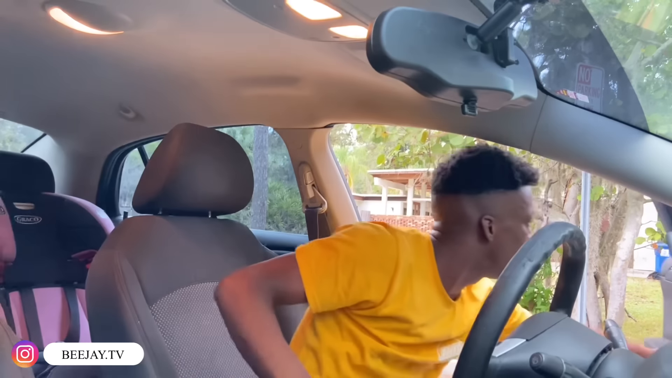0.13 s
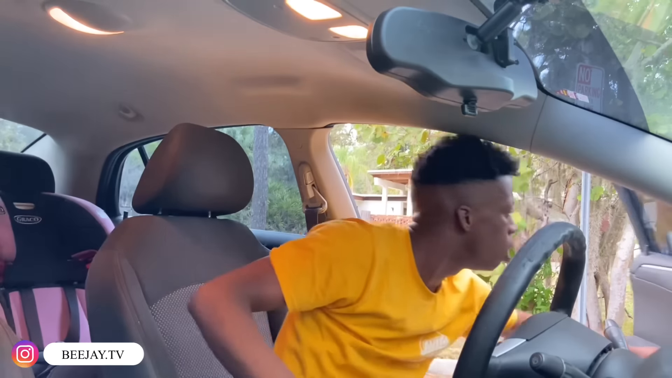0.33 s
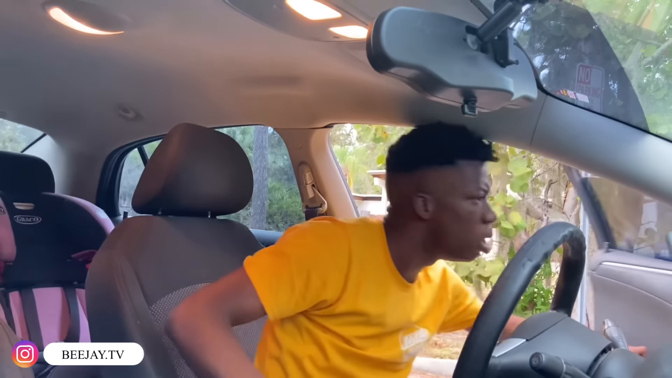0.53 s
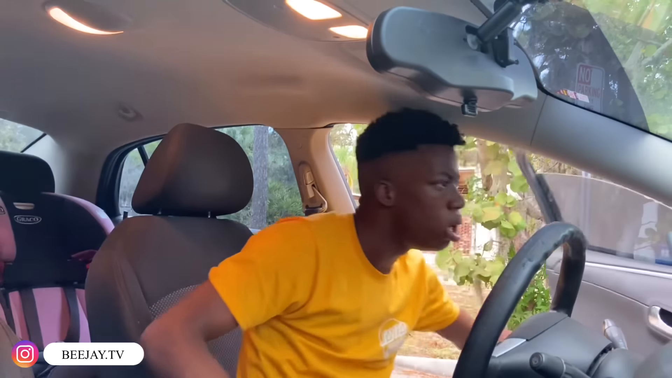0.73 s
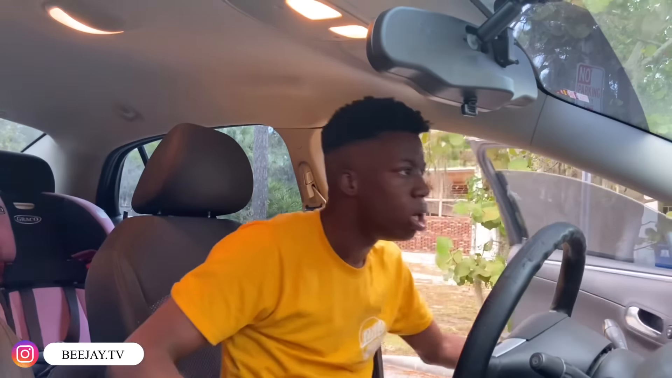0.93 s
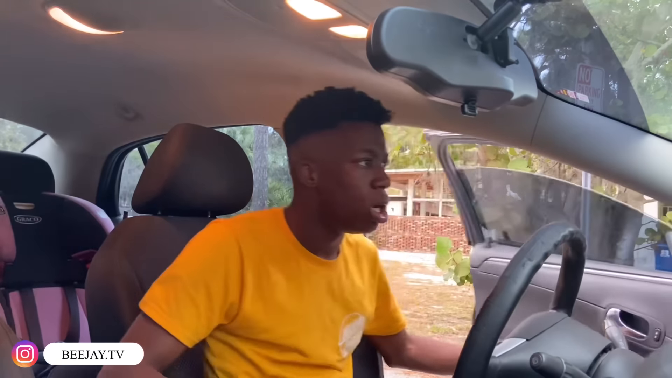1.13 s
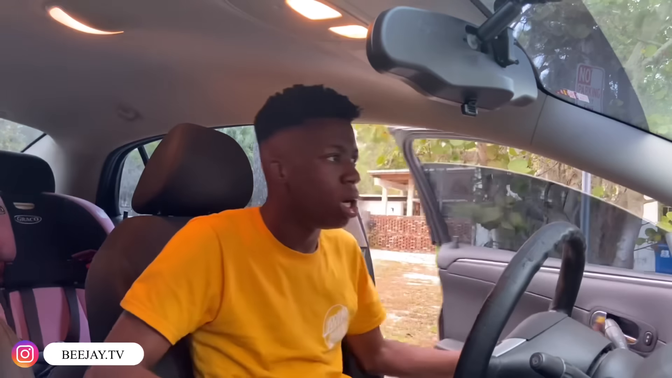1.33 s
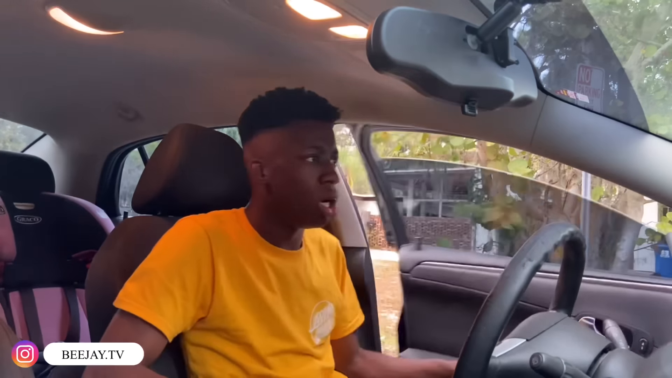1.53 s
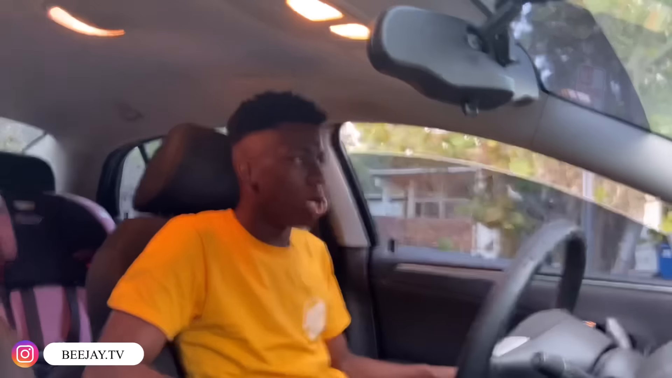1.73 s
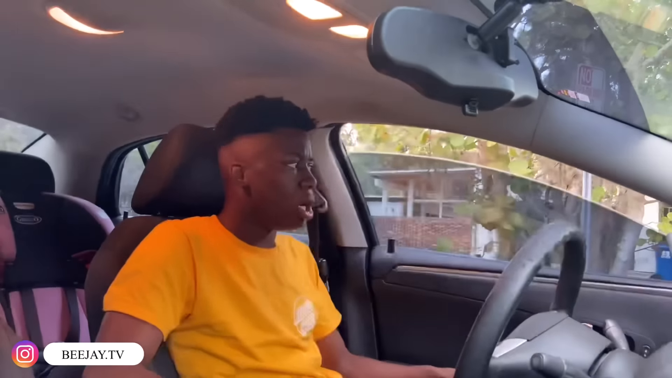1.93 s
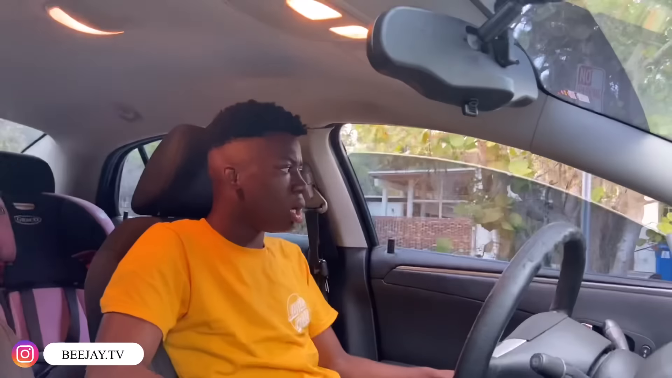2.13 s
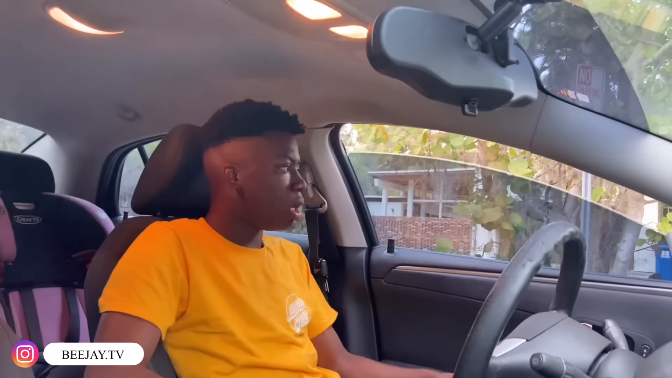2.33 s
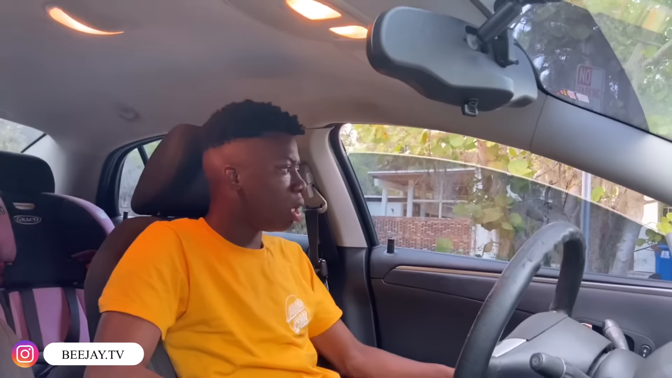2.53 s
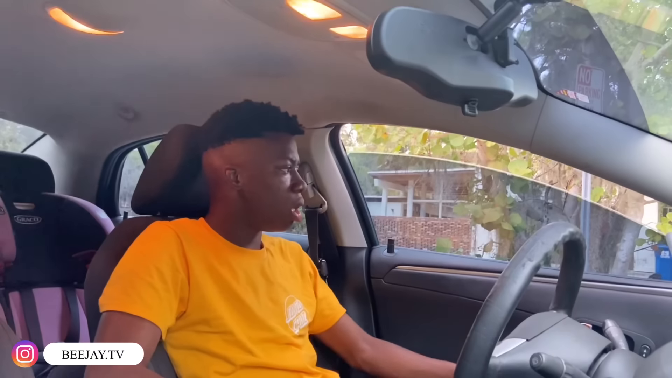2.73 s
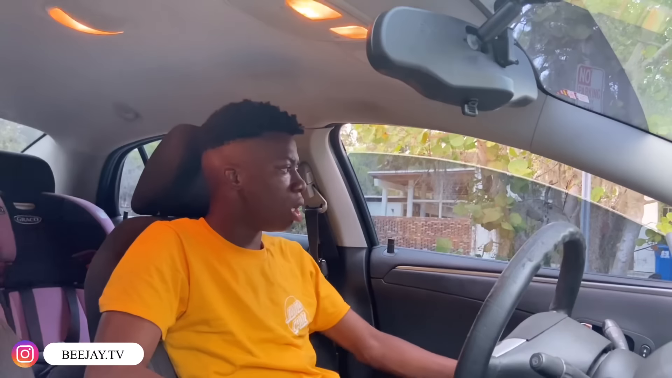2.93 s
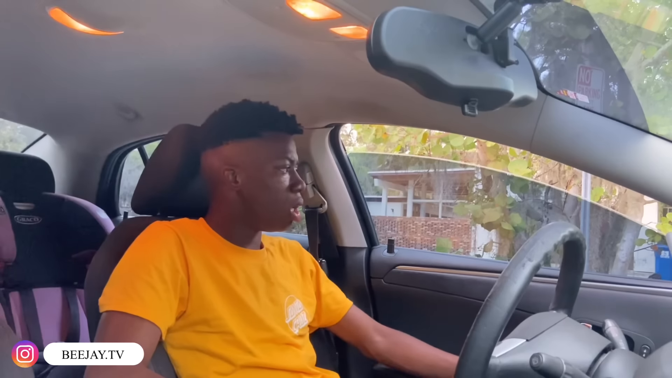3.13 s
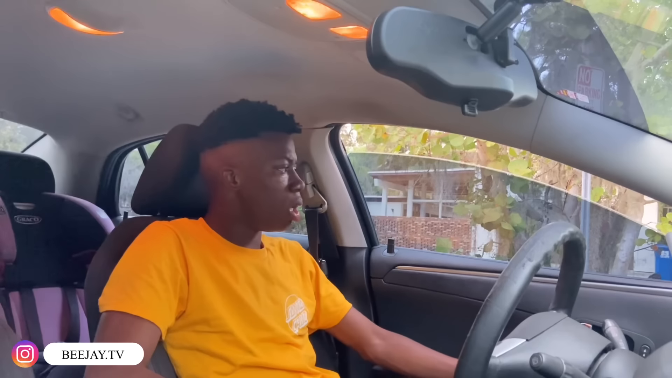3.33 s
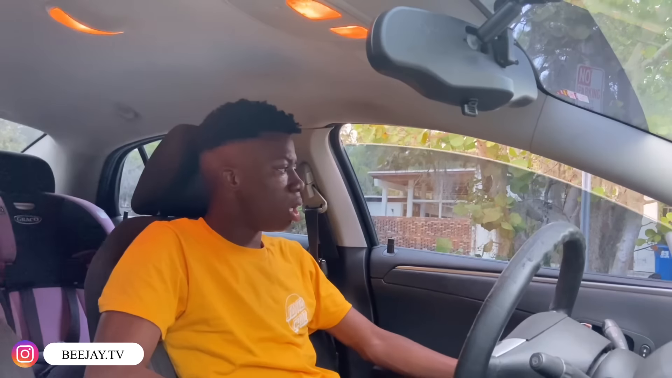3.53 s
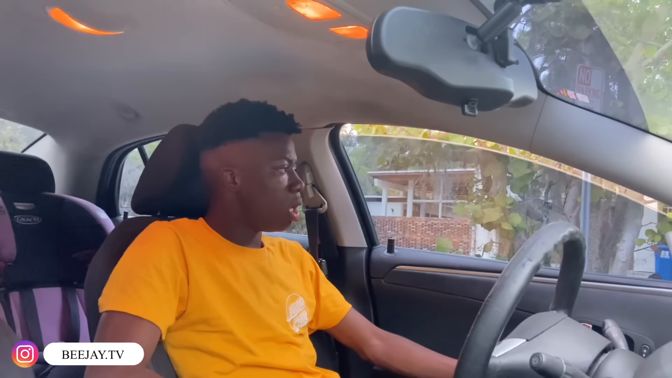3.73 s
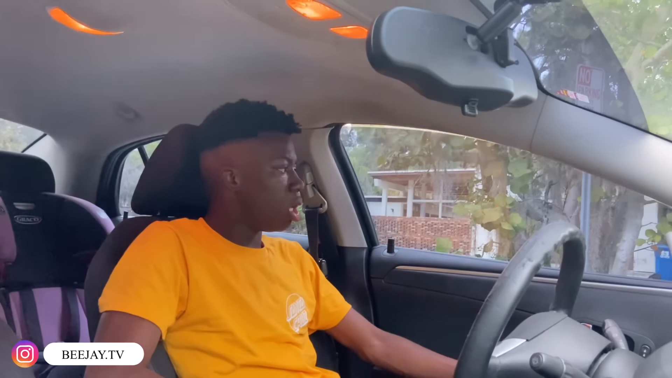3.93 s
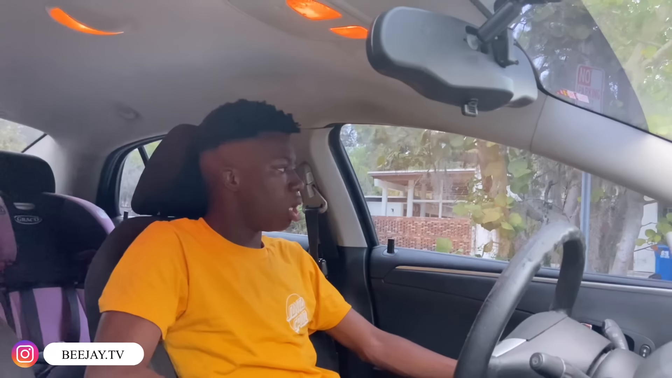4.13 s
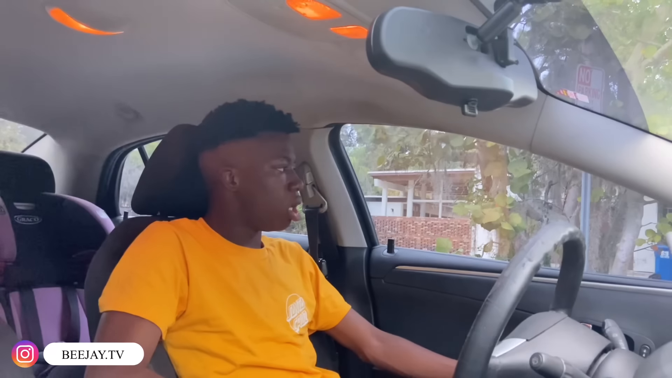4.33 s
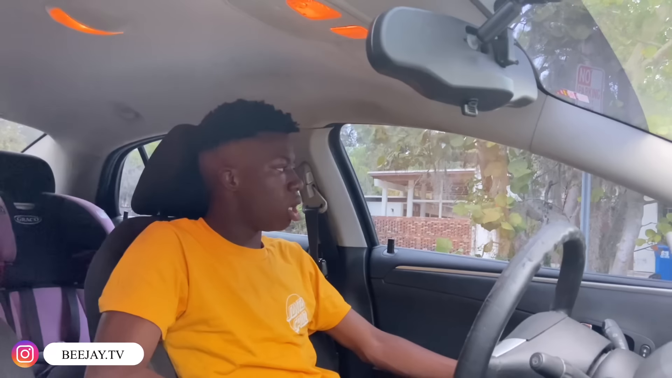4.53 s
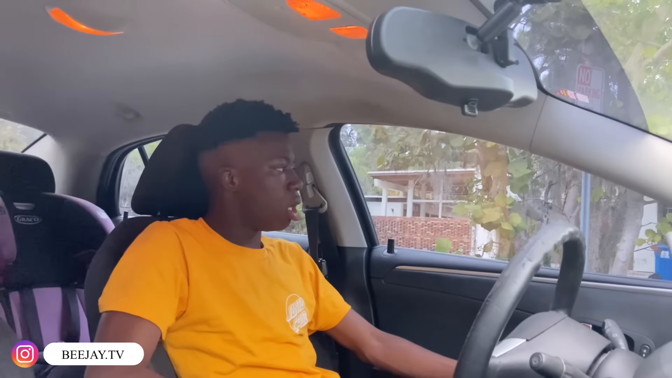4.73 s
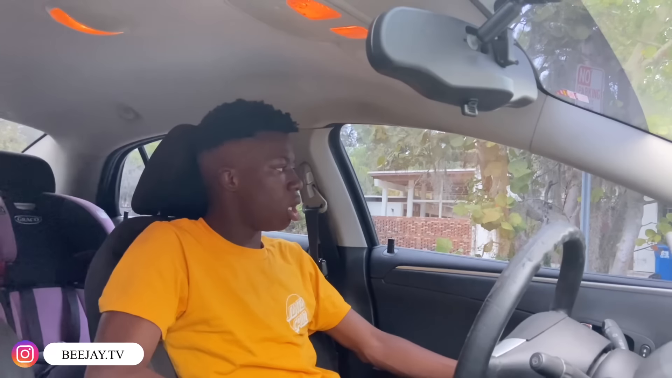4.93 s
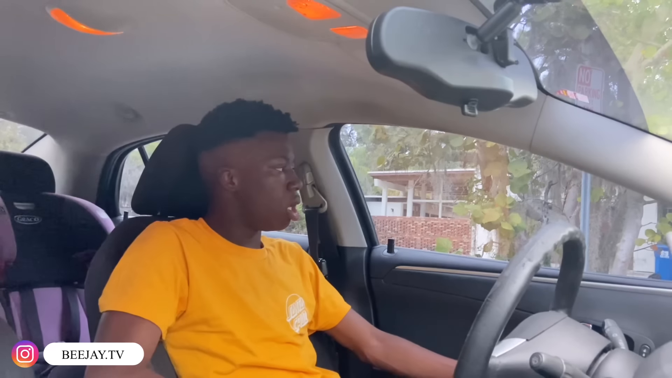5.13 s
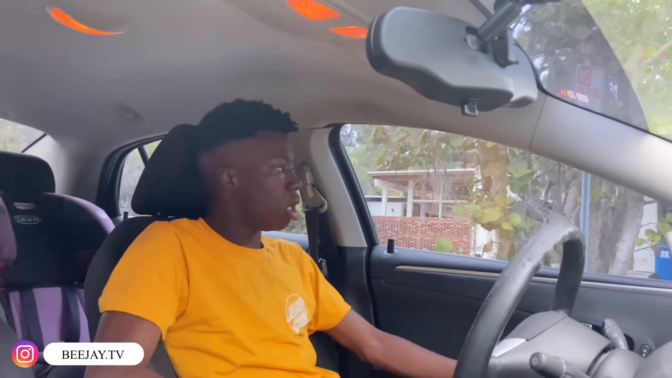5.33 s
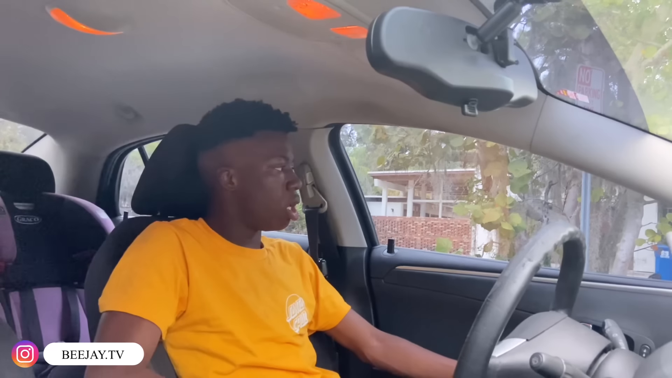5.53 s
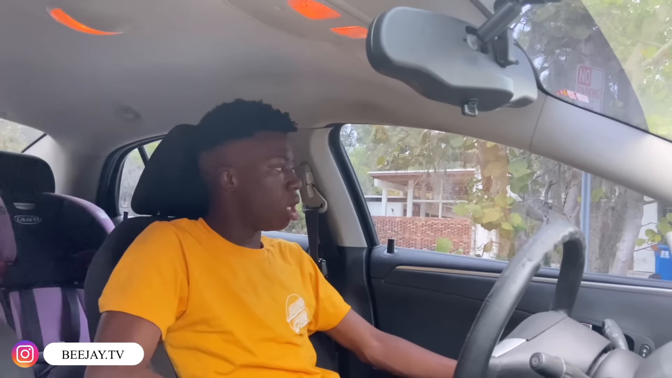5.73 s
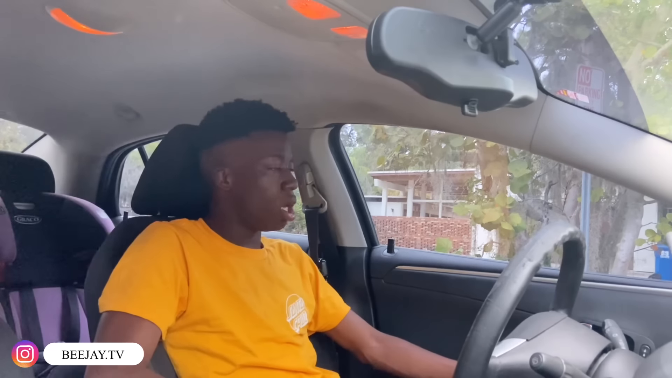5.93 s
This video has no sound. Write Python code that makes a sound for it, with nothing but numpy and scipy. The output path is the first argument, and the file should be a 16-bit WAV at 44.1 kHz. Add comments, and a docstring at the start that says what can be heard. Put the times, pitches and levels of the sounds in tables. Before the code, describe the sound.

Inside a small car with the engine idling low, air and clothing rustle through the open door. The door bumps dully as it is pulled, clicks, then slams with a loud latch crack, bassy body boom and short trim rattle. Quiet scuffs and taps follow. A power window then clunks, drones and whines upward, glass rubbing rubber, and thuds into its seal. Heard from the dashboard on a phone.

```python
"""A car door slams at close range: latch, body and trim ring as damped modes under a burst of rattle noise.
The open door bumps dully before it; clicks and scuffs come before and after it, taps and ticks after it.
Later the power window drones and whines upward, its glass rubbing the rubber, until it thuds into its seal.
Behind all this a four-cylinder engine idles as hum, rumble and knocks, with a patchy rustle of air and clothes.
The place is the cabin, heard from the dashboard through the two microphone ports of a phone."""
import sys
import numpy as np
from scipy import signal
from scipy.fft import rfft, irfft, next_fast_len
from scipy.io import wavfile
from scipy.ndimage import uniform_filter1d

SR = 44100
rng = np.random.default_rng(int(sys.argv[2]) if len(sys.argv) > 2 else 0)


def store_wav(level_fs):
    """Save 16-bit WAV to argv[1]."""
    pcm = np.round(np.clip(np.atleast_2d(level_fs), -1, 1) * 32767)
    wavfile.write(sys.argv[1], SR, pcm.T.astype(np.int16))


N = 267554
T = np.arange(N) / SR  # s

# All levels in the tables are relative: the port balance and the phone come after them.
# Likeness of the two microphone ports. Each row: frequency in Hz, likeness of left and right from 0 to 1.
PORT_LIKENESS = [(60, .95), (130, 0.97), (270, 0.9), (580, 1), (1200, 0), (12000, 0)]
LEFT_DB, LEFT_LAG_S = -2.1, .00046  # left against right
CEILING, TOP_HZ = 0.82, 12350  # the phone's limit on a full scale of 1, and its upper cutoff

# Outside air and clothes, loud with the door open and faint after the slam. Each row: time in seconds, level in dB.
AIR = [(0, -68.5), (1.1, -65.5), (1.88, -69), (2.03, -80), (3.05, -76), (3.33, -72)]
# Colour of that rustle. Each row: frequency in Hz, density in dB per Hz.
AIR_COLOUR = [(410, -31.5), (700, -23), (734, -3), (788, -2.5), (1750, -14.5), (3970, -19.5), (6540, -28),
              (9350, -48.5), (12000, -59), (15600, -81), (22000, -120)]

# Idle speed. Each row: time in seconds, firings per second.
FIRING_RATE = [(0, 24.42), (.45, 24.9), (1.1, 24.135), (1.8, 23.836), (3.1, 23.85), (3.8, 23.984),
               (4.4, 23.595), (6.07, 24.415)]
FIRST_FIRING = .105  # part of a firing already gone at the start
# Engine hum. Each row: multiple of the firing rate, level in dB.
HUM_ORDERS = [(1, -49.5), (2, -40.5), (3, -45), (4, -50.5), (5, -49), (6, -59.5), (8, -50.5)]
# Engine in the cabin, muffled once the door is shut, boomier as the window closes.
# Each row: time in seconds, hum and rumble in dB, knocks in dB, sharpness of their strike in dB.
IDLE = [(0, 0.5, -3.5, -6), (1.1, 2, -0.5, -6), (1.7, 1, -2, -5.5), (2.1, -1, -7.5, -6),
        (2.6, -3, -5, -5.5), (3.2, -2, -3, -5), (3.45, -1.5, -1.5, -6.5), (4.25, 0, 0.5, -6.5),
        (4.4, 1, -1, -1), (6.07, 1.5, -1.5, 0)]
# Colour of the engine rumble. Each row: frequency in Hz, density in dB per Hz.
RUMBLE_COLOUR = [(18, -21.5), (31, -27), (48, -6.5), (85, -1.5), (130, -8), (200, -14), (300, -18),
                 (430, -28.5), (780, -44), (1000, -46), (1800, -59), (3500, -71.5), (7000, -74.5),
                 (12300, -84.5)]
RUMBLE_DB = -37.5
# Knocks in each firing. Each row: place in the firing from 0 to 1, centre in Hz, width in Hz of each filter pass,
# t60 in seconds, level in dB, clean strike against its noise in dB.
FIRING_KNOCKS = [(.23, 285, 310, .09, -54, -4), (.285, 535, 210, .032, -58.5, 2),
                 (.775, 535, 210, .035, -61.5, -2), (.245, 745, 195, .032, -60.5, 1),
                 (.55, 745, 195, .15, -70, -8), (.19, 1795, 270, .07, -81.5, 1.5),
                 (.21, 2950, 800, .02, -89, 2), (.225, 3800, 3000, .013, -92.5, 0)]

# Window going up; the drone sags as the seal grips the glass.
# Each row: time in seconds, door panel drone in Hz, drone level in dB, motor shaft hum in dB.
WINDOW = [(3.35, 73.6, -42, -50), (3.375, 75.5, -38, -48), (3.41, 78, -30, -46), (3.45, 80.3, -28.5, -45),
          (3.5, 81, -26, -44), (3.63, 82.6, -27.5, -44), (3.8, 81.6, -26, -42), (4, 80.5, -25.5, -35),
          (4.315, 78, -28.5, -35)]
SHAFT_HZ, SHAFT_START = 72.6, .07  # motor shaft, which beats against the drone; start in turns
# Motor whine. Each row: multiple of the shaft rate, level in dB.
WHINE = [(5, -60), (6, -68.5), (7, -60), (8, -70), (10, -61.5), (12, -88), (13, -75.5), (14, -85.5),
         (15, -85.5), (17, -80), (18, -87.5), (28, -98), (30, -89.5)]
# Colour of the glass dragging in the seal. Each row: frequency in Hz, density in dB per Hz.
RUB_COLOUR = [(700, -13.5), (1200, -10.5), (1800, -21), (2150, -19), (2500, -25), (2950, -17), (3400, -23),
              (4800, -25), (5600, -30), (6600, -28), (9900, -56), (12300, -51.5)]
RUB_DB, RUB_RISE_DB_S = -70, 6.5  # start, and rise in dB per s as more of the glass is gripped
# Singing rubber: start in Hz, sag in Hz per s, rate in Hz of its random levels, level in dB.
SEAL_HZ, SEAL_SAG_HZ_S, SEAL_WIDTH_HZ, SEAL_DB = 3100, 227, 130, -82
# Lift gear. Each row: mode in Hz, level in dB, t60 in seconds.
GEAR = [(177.5, -1, .1), (317, 4, 0.12), (450, -7, 0.083), (540, -6, 0.052), (626, -13, 0.06)]
# Gear taking up its slack. Each row: time in seconds, push in dB, contact in seconds.
CLUNKS = [(3.341, -36, 0.00096), (3.352, -34, .0015), (3.364, -42.5, 0.00077), (3.380, -35.5, 0.00071),
          (3.389, -40, 0.00092), (3.41, -38, 0.00096), (3.421, -38.5, 0.00095), (3.463, -41.5, .0013)]
# Window frame struck by the glass. Each row: mode in Hz, level in dB, t60 in seconds.
FRAME = [(51.3, -2.5, 0.65), (89, -8.5, 0.65), (129, 11, 0.047), (240.3, -2, 0.073), (316, -5, 0.081),
         (430, -8, 0.18), (540, -23, 0.038)]
# Glass meeting its stop and rebounding. Each row: time in seconds, push in dB, contact in seconds.
STOPS = [(4.325, -27, 0.00064), (4.329, -15, 0.0022), (4.350, -15, 0.0043), (4.396, -22.5, 0.0043)]

# Sharp clicks and ticks, the latch crack, and strong engine knocks through the open door.
# Each row: time in seconds, peak in dB ahead of the tilt between ports, centre in Hz,
# width in Hz of each filter pass, t60 in seconds.
CLICKS = [(.809, -55.5, 3440, 2500, 0.042), (.809, -46, 550, 200, 0.095), (.902, -39, 540, 197, 0.11),
          (.899, -56.5, 2470, 2500, .06), (.948, -46, 2260, 3270, 0.12), (.992, -52, 1780, 2480, 0.072),
          (1.145, -54.5, 2980, 3500, .032), (1.191, -56, 3450, 3000, 0.059),
          (1.227, -55.5, 2990, 2970, 0.074), (1.6795, -11.5, 2975, 2000, 0.024),
          (1.68, -18, 5190, 4500, .025), (2.382, -57.5, 3000, 3500, 0.084), (2.571, -66.5, 1850, 500, .06),
          (2.613, -64, 3650, 600, 0.048), (2.625, -54, 4600, 4570, 0.093), (3.075, -60, 2395, 2000, 0.064),
          (3.195, -60, 3030, 2000, 0.084), (3.264, -64, 4500, 2990, .06), (3.294, -56.5, 3300, 3450, 0.13),
          (3.330, -43, 2900, 2010, 0.068), (3.336, -40, 1790, 3440, 0.076), (3.488, -60, 1850, 357, .06),
          (5.826, -64.5, 2960, 3000, 0.027), (5.844, -51, 4530, 3230, 0.077),
          (5.853, -53, 3620, 150.5, 0.066)]
# Scuffs, and growl of the window motor, that swell before they fade.
# Each row: the same columns in the same units as the clicks.
SCUFFS = [(.125, -66.5, 4050, 2000, .2), (.25, -60.5, 4050, 2500, .15), (.305, -51.5, 2570, 2510, 0.34),
          (.447, -56, 2750, 3000, 0.35), (.45, -69, 8200, 2000, .1), (.63, -57, 1690, 1810, .12),
          (1.3, -62.5, 4160, 2080, 0.2), (2.0, -56, 1490, 1780, 0.27), (2.245, -64.5, 2000, 2480, 0.38),
          (2.52, -63.5, 1280, 1503, 0.28), (2.98, -69.5, 2490, 3500, 0.39), (2.64, -54, 1250, 490, 0.23),
          (2.645, -56.5, 2460, 3010, 0.16), (3.335, -50, 500, 500, 0.52), (3.39, -43.5, 450, 450, 0.44),
          (4.165, -50.5, 3130, 2500, 0.12), (4.18, -45, 2360, 2940, 0.1), (4.25, -55.5, 1387, 395, 0.13),
          (4.305, -46.5, 1730, 2650, 0.25), (5.832, -65, 4000, 2500, .15)]
CLICK_RISE_S, SCUFF_RISE_S = 0.00068, 0.009
CLICK_LEFT_DB = 3  # left minus right, clicks and scuffs alike
CLICK_STRIKE_DB, CLICK_APART = 15, 1  # clean impulse in a click; weight of noise that differs between the ports
# Hard trim. Each row: mode in Hz, level in dB, t60 in seconds.
TRIM = [(653, -6.5, 0.052), (895, -0.5, 0.052), (1110, -9.5, 0.041), (1258, -6.5, 0.078),
        (1320, -10.5, .05), (1730, -11, 0.045)]
# Taps of a hand on the trim. Each row: time in seconds, push in dB, contact in seconds.
TAPS = [(2.248, -57, 0.00039), (2.624, -42.5, 0.00051), (2.629, -41.5, 0.00056), (3.075, -44, .0008),
        (3.189, -55, 0.00064), (3.198, -54, 0.00045), (3.336, -49, .0004), (3.343, -46, 0.00069),
        (3.38, -39.5, 0.0012)]
# Small hard plastic part. Each row: mode in Hz, level in dB, t60 in seconds.
PLASTIC = [(1920, -2, .03), (3020, 6.5, .05), (3620, 0, .05), (4320, -19.5, .03), (4840, -11.5, 0.04),
           (6200, -12, 0.04)]
# Ticks of the plastic part. Each row: time in seconds, push in dB, contact in seconds.
TICKS = [(2.383, -63, .0001), (2.626, -55, .00008), (5.845, -58.5, .0001)]

# Damped modes of the open door. Each row: mode in Hz, level in dB, t60 in seconds.
OPEN_DOOR = [(69, -4, 0.19), (105, -2, 0.063), (175, 3, 0.049), (337, -6.5, 0.065), (494, 0, 0.049)]
# Bumps as the door is pulled. Each row: time in seconds, push in dB, contact in seconds.
BUMPS = [(.628, -31, 0.00093), (.638, -23, 0.0016), (.643, -19, 0.0041), (.661, -22.5, 0.0025),
         (.6765, -18, 0.0067), (1.026, -21, 0.0047), (1.053, -20.5, 0.0045)]
# Door, body and cabin air. Each row: mode in Hz, level in dB.
BODY = [(48, -10), (64, -10), (78, -8), (85, -3), (92, 2), (110, -2), (133, -6), (152, -8.5), (184, -3.5),
        (212, -11), (232, -4.5), (248, -7), (272, -4), (296, -5), (324, -4), (345, -6.5), (393, -14),
        (420, -11), (466, -10.5), (490, -11), (560, -35.5), (650, -33), (738, -18), (861, -24),
        (980, -24.5), (1185, -18.5), (1272, -21), (1432, -43), (1780, -19), (2012, -24), (2270, -27.5),
        (2610, -21.5), (2770, -19.5), (3040, -8.5), (3640, -26.5), (3940, -22.5)]
BODY_T60, BODY_DAMPING = 0.35, 0.75  # ring in s of the main boom at 92 Hz; higher modes die faster by this power
# Blows on the body. Each row: time in seconds, ring push in dB, contact in seconds, trim rattle in dB.
BLOWS = [(1.666, -30.5, 0.00041, -33), (1.669, -27.5, 0.00019, -29.5), (1.676, -23, 0.0012, -23.5),
         (1.680, -10.5, 0.00028, -20.5), (1.684, -4.5, 0.0016, -27), (1.696, -6.5, 0.0039, -28.5),
         (1.707, -22, 0.0006, -30), (1.716, -17, 0.0013, -29), (1.7285, -9, 0.0041, -43.5),
         (1.736, -23, 0.00064, -25.5), (1.754, -22.5, 0.00092, -46.5), (1.763, -23.5, 0.002, -48),
         (1.773, -23, 0.001, -41), (1.7911, -11.5, 0.0042, -41.5), (1.806, -32.5, 0.0014, -42),
         (1.838, -12, 0.0081, -46.5), (1.862, -39.5, 0.00077, -53.5), (1.898, -22, 0.0082, -62.5),
         (1.907, -40.5, 0.00063, -62), (1.96, -21, 0.019, -58), (2.039, -38.5, 0.0019, -59.5),
         (5.828, -37, 0.0011, -78)]
# Colour of the trim rattle. Each row: frequency in Hz, density in dB per Hz.
RATTLE_COLOUR = [(350, -17), (600, -18.5), (700, -8), (831, -2), (919, -7.5), (1140, -8), (2800, -21.5),
                 (3880, -24.5), (6570, -32), (10300, -48.5), (12000, -43), (15600, -70), (22000, -120)]
RATTLE_SPLIT_HZ = 1800
RATTLE_T60_S, DULL_RATTLE_T60_S = 0.088, 0.11  # above and below the split
PANEL_SHAKE_DB, PANEL_HZ = -21.5, 396  # the rattle keeps the door panel's middle modes going
# Latch grinding over the striker before it catches. The row: from second, to second, level in dB, centre in Hz,
# width in Hz of each filter pass.
LATCH = (1.663, 1.685, -23, 1600, 1700)


def undb(db):
    """Decibels to amplitude."""
    return 10 ** (np.asarray(db) / 20)


def curve(table):
    """Draw each column of a timed table as a line over the whole scene."""
    s, *columns = np.transpose(table)
    return [np.interp(T, s, column) for column in columns]


def over_hz(table, hz):
    """Read a frequency table along a logarithmic axis."""
    table_hz, values = np.array(table).T
    return np.interp(np.log(hz), np.log(table_hz), values)


def walk(rate):
    """Random levels held 1 / rate s and slewed twice; spread near 1."""
    hold = int(SR / rate)
    steps = np.repeat(rng.standard_normal(N // hold + 1), hold)
    return 1.3 * uniform_filter1d(uniform_filter1d(steps, hold), hold)[:N]


def hiss(colour, flicker_db, rate):
    """Stereo noise of a given colour, rms 1, whose bands a factor of three apart flicker on their own."""
    size = next_fast_len(N)
    hz = np.maximum(np.fft.rfftfreq(size, 1 / SR), 1)
    alike = np.clip(over_hz(PORT_LIKENESS, hz), -1, 1)
    mid, side = rfft(rng.standard_normal((2, size))) * np.sqrt([1 + alike, 1 - alike])
    inside = (hz > colour[0][0]) * (hz < colour[-1][0])
    both = np.array([mid + side, mid - side]) * undb(over_hz(colour, hz)) * inside
    out = 0
    for centre in 40 * 3. ** np.arange(6):
        distance = np.clip(np.log(hz / centre) / np.log(3), -1, 1)
        share = np.cos(np.pi / 2 * distance) ** 2  # neighbouring bands overlap
        out = out + irfft(both * share, size)[:, :N] * undb(flicker_db * walk(rate))
    return out / out.std()


def band(x, hz, width_hz, passes=3):
    """Resonant filter, repeated for steeper skirts."""
    for _ in range(passes):
        x = signal.lfilter(*signal.iirpeak(hz, hz / width_hz, fs=SR), x)
    return x


def fade(kicks, t60):
    """Every kick dies away exponentially."""
    return signal.lfilter([1], [1, -np.exp(-np.log(1000) / (t60 * SR))], kicks)


def ring(hits, modes, spread, scrape=0):
    """Push and rebound drive modes, so short taps leave the bass still; ports meet a mode at their own phase."""
    push, mid, side = np.zeros(N) + scrape, 0, 0
    for s, db, contact_s in hits:
        i, n = int(s * SR), max(int(contact_s * SR), 2)
        push[i:i + 2 * n] += undb(db) * np.sin(np.pi * np.arange(2 * n) / n) / n
    for k, (hz, db, t60) in enumerate(modes):
        pole = np.exp(2j * np.pi * hz / SR - np.log(1000) / (t60 * SR))
        mode = signal.lfilter([undb(db)], [1, -pole], push + 1e-18)  # tiny offset keeps the filter quick
        alike = np.clip(over_hz(PORT_LIKENESS, hz), -1, 1)
        turn = (-1) ** k * spread * np.arccos(alike)
        mid, side = mid + np.cos(turn) * mode.imag, side + np.sin(turn) * mode.real
    return np.array([mid + side, mid - side])


def air():
    """Patchy rustle of outside air and clothes, stopping just before the window motor starts."""
    db = curve(AIR)[0] + 1.9 * walk(33)
    on = uniform_filter1d(1. * (T < AIR[-1][0]), 800)
    return undb(db) * on * hiss(AIR_COLOUR, 1.6, 54)


def firing_knocks(phase, sharp):
    """Each firing kicks bands of noise, of uneven strength, behind a clean strike."""
    knocks = 0
    for place, hz, width_hz, t60, db, strike_db in FIRING_KNOCKS:
        kicks = np.zeros(N)
        at = np.flatnonzero(np.diff(np.floor(phase - place)))
        kicks[at] = undb(1.6 * rng.standard_normal(len(at)))
        swell = uniform_filter1d(fade(kicks, t60), int(2 * SR / hz))  # builds up over two cycles
        swell = sharp * swell + (1 - sharp) * swell.std()  # dull knocks smear into steady noise
        strike = undb(strike_db) * sharp * np.sqrt(t60 * SR / np.log(1000))
        knock = band(strike * kicks + swell * rng.standard_normal((2, N)), hz, width_hz)
        knocks = knocks + undb(db) * knock / knock.std()
    return knocks


def engine():
    """Wavering hum on the firing multiples, rumble noise, and knocks locked to the firings."""
    phase = FIRST_FIRING + np.cumsum(curve(FIRING_RATE)[0]) / SR  # in firings
    cabin_db, knocks_db, sharp_db = curve(IDLE)
    hum = 0
    for order, db in HUM_ORDERS:
        level = np.sqrt(2) * undb(db + 0.96 * walk(2.4))
        hum = hum + level * np.cos(2 * np.pi * order * phase + 0.44 * walk(8.9))
    rumble = undb(RUMBLE_DB) * hiss(RUMBLE_COLOUR, 1.2, 8)
    knocks = firing_knocks(phase, np.minimum(undb(sharp_db), 1))
    return undb(cabin_db) * (hum + rumble) + undb(knocks_db) * knocks


def seal_rub(run_s):
    """Glass drags along the rubber as noise, and the rubber sings around a pitch that sags as it grips."""
    rub = undb(RUB_DB + RUB_RISE_DB_S * run_s) * hiss(RUB_COLOUR, 1.2, 20)
    sag = 2 * np.pi * (SEAL_HZ - SEAL_SAG_HZ_S * run_s / 2) * run_s
    song = walk(SEAL_WIDTH_HZ) * np.cos(sag) + walk(SEAL_WIDTH_HZ) * np.sin(sag)
    return rub + undb(SEAL_DB + 2.5 * walk(9.1)) * song


def window():
    """The lift motor whines and drones through the door panel while the glass rubs the seal."""
    hz, drone_db, shaft_db = curve(WINDOW)
    start, stop = WINDOW[0][0], WINDOW[-1][0]
    on = uniform_filter1d(1. * (T > start) * (T < stop), 800)
    turns = 2 * np.pi * np.cumsum(hz * (T > start)) / SR
    drone = np.sin(turns) + undb(-20.5) * np.sin(2 * turns) + undb(-40.5) * np.sin(4 * turns)
    shaft = 2 * np.pi * (SHAFT_START + SHAFT_HZ * (T - start))
    whine = undb(shaft_db) * np.sin(shaft)
    for order, db in WHINE:
        whine = whine + undb(db + 2.7 * walk(16)) * np.sin(order * shaft + 1.4 * walk(22))
    return on * (np.sqrt(2) * (undb(drone_db) * drone + whine) + seal_rub(T - start))


def lift_gear():
    """Gear clunks as its slack is taken up, ringing short low modes."""
    return ring(CLUNKS, GEAR, 0.16)


def glass_stop():
    """The glass thuds into its stop and rebounds, ringing the window frame."""
    return ring(STOPS, FRAME, 0.12)


def clicks_and_scuffs():
    """Short noise bursts around their own centres; clicks open with a clean strike, scuffs swell first."""
    n = 16384
    out, t = np.zeros((2, N + n)), T[:n]
    tilt_db = np.array([[CLICK_LEFT_DB], [-CLICK_LEFT_DB]]) / 2
    for table, rise_s, strike in ((CLICKS, CLICK_RISE_S, undb(CLICK_STRIKE_DB)), (SCUFFS, SCUFF_RISE_S, 0)):
        for s, db, hz, width_hz, t60 in table:
            shape = np.minimum(t / rise_s, 1) * undb(-60 * t / t60)
            noise = rng.standard_normal(n) + CLICK_APART * rng.standard_normal((2, n))
            noise[:, int(rise_s * SR)] += strike
            burst = band(noise, hz, width_hz) * shape
            i = int(s * SR)
            out[:, i:i + n] += burst / np.abs(burst).max() * undb(db + tilt_db)
    return out[:, :N]


def trim_taps():
    """A hand taps hard trim, whose middle modes ring briefly."""
    return ring(TAPS, TRIM, 0.83)


def plastic_ticks():
    """Very short contacts ring the high modes of a small plastic part."""
    return ring(TICKS, PLASTIC, 0.3)


def open_door():
    """The open door bumps dully as it is pulled, its modes heavily damped."""
    return ring(BUMPS, OPEN_DOOR, 0.23)


def trim_rattle(dull, bright):
    """Shaken trim rattles as noise whose treble dies first."""
    trim = undb(2 * walk(500) - 3) * hiss(RATTLE_COLOUR, .7, 60)
    low = signal.sosfilt(signal.butter(1, RATTLE_SPLIT_HZ, fs=SR, output="sos"), trim)
    return uniform_filter1d(dull, 90) * low + uniform_filter1d(bright, 90) * (trim - low)


def latch_grind():
    """The latch grinds over the striker: banded noise that grows in 4 ms and stops dead."""
    start, stop, db, hz, width_hz = LATCH
    shape = np.clip((T - start) / .004, 0, 1) * (T < stop)
    return undb(db) * shape * band(rng.standard_normal(N), hz, width_hz)


def door_slam():
    """Blows and latch ring the body and shake the trim into a rattle, which feeds the door panel."""
    shakes = np.zeros(N)
    for s, _, _, rattle_db in BLOWS:
        shakes[int(s * SR)] += undb(rattle_db)
    dull, bright = fade(shakes, DULL_RATTLE_T60_S), fade(shakes, RATTLE_T60_S)
    panel = undb(PANEL_SHAKE_DB) * dull * band(rng.standard_normal(N), PANEL_HZ, PANEL_HZ, passes=2)
    modes = [(hz, db, BODY_T60 * (92 / hz) ** BODY_DAMPING) for hz, db in BODY]
    body = ring(np.array(BLOWS)[:, :3], modes, 0.56, latch_grind() + panel)
    return body + trim_rattle(dull, bright)


def scene():
    """Sum the cabin from the background forward and set the balance of the two ports."""
    background = air() + engine()
    lift = window() + lift_gear() + glass_stop()
    small_sounds = clicks_and_scuffs() + trim_taps() + plastic_ticks()
    left, right = background + lift + small_sounds + open_door() + door_slam()
    # door and engine lie nearer the right port
    late_left = np.roll(left, int(LEFT_LAG_S * SR))
    return np.array([late_left * undb(LEFT_DB / 2), right * undb(-LEFT_DB / 2)])


def record(dry):
    """The phone drops the deepest bass, rounds the loudest peaks and cuts the top."""
    opened = dry * np.minimum(T / 0.0013, 1)  # brief fade in
    lean = signal.sosfilt(signal.butter(2, 22, "high", fs=SR, output="sos"), opened)
    soft = CEILING * np.tanh(lean / CEILING)
    return signal.sosfilt(signal.ellip(8, .2, 70, TOP_HZ, fs=SR, output="sos"), soft)


dry = scene()
out = record(dry)
store_wav(out)
```